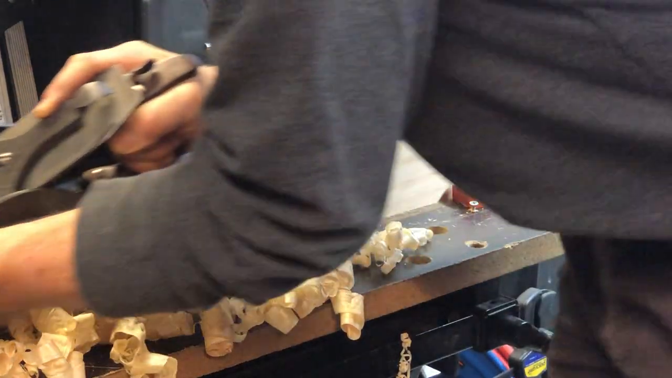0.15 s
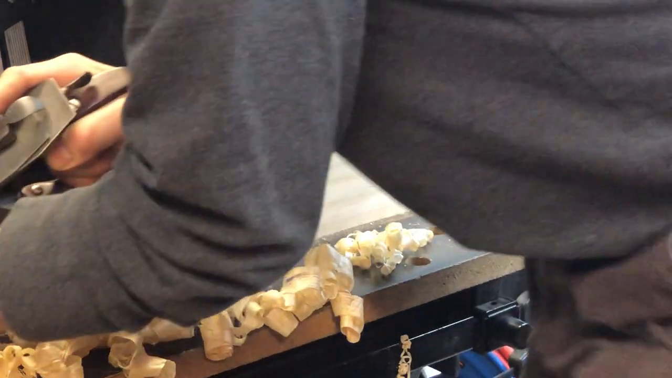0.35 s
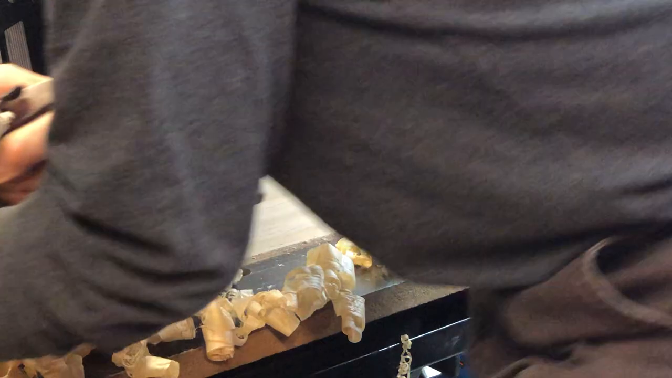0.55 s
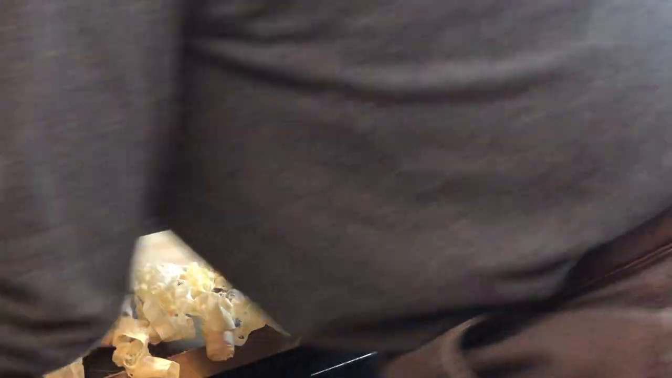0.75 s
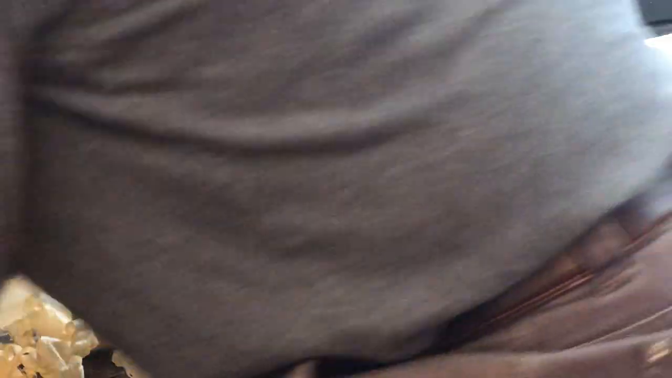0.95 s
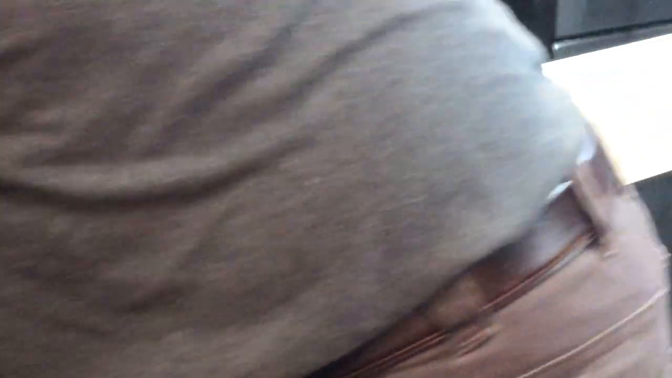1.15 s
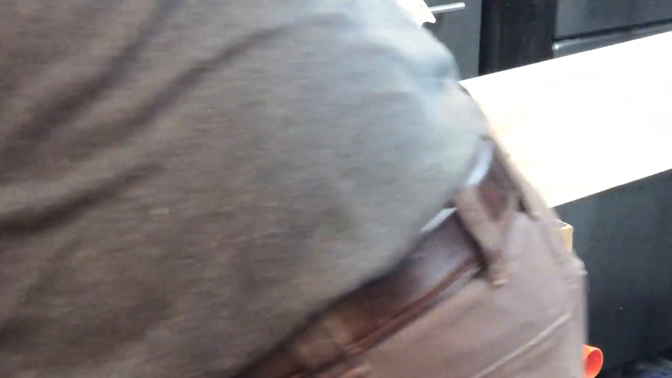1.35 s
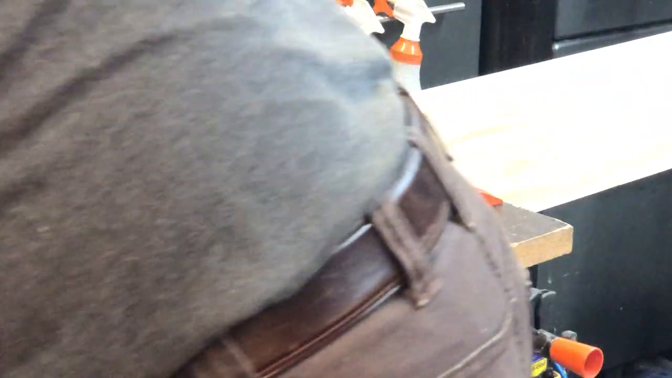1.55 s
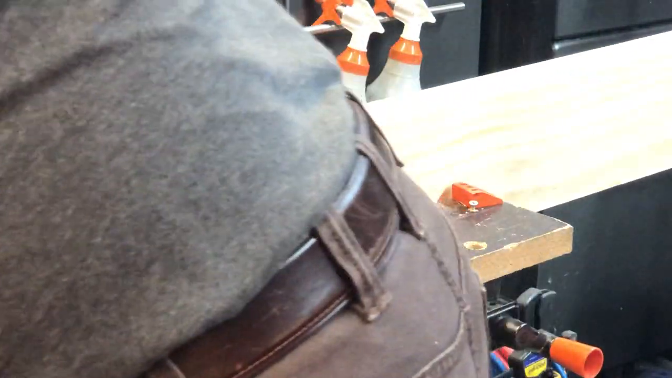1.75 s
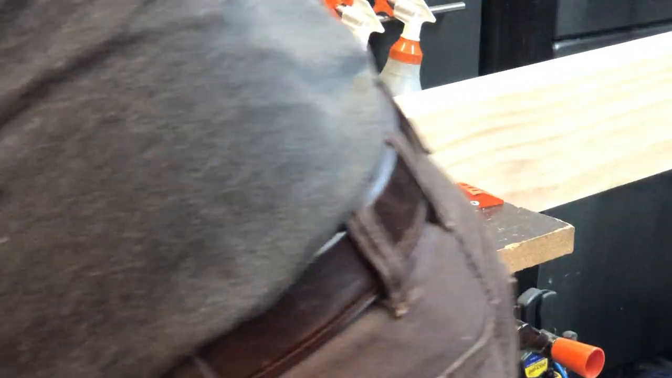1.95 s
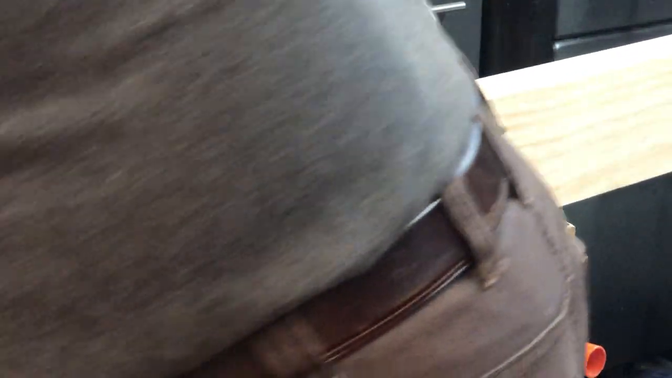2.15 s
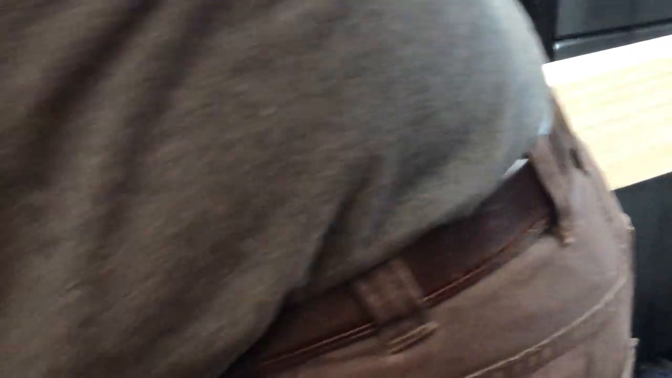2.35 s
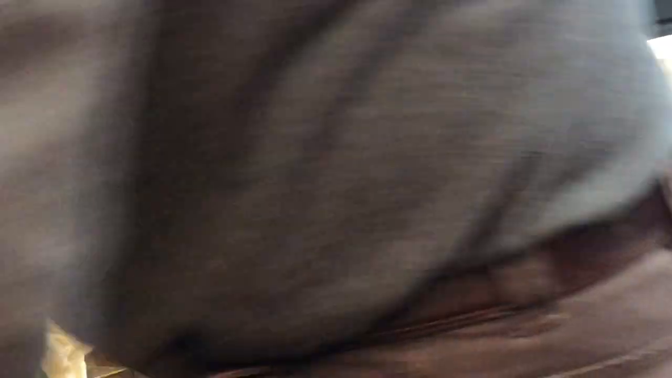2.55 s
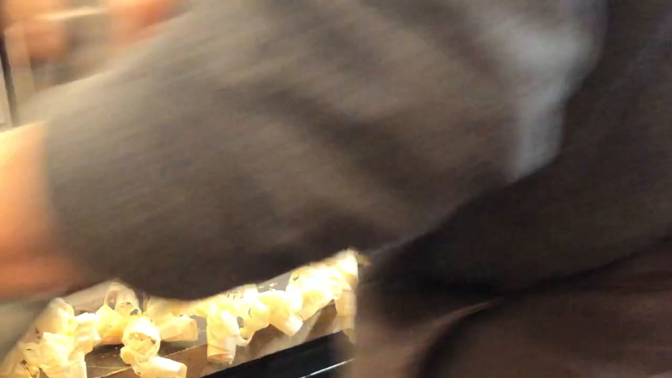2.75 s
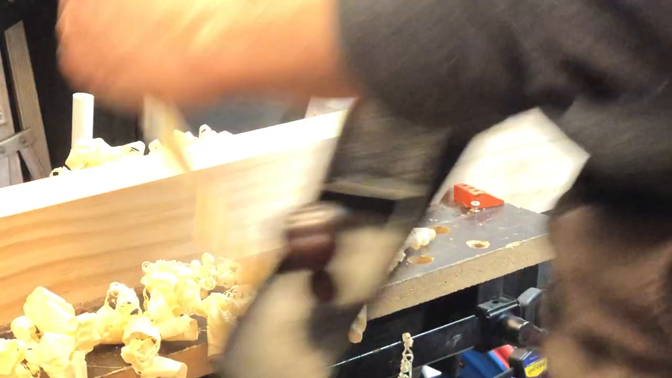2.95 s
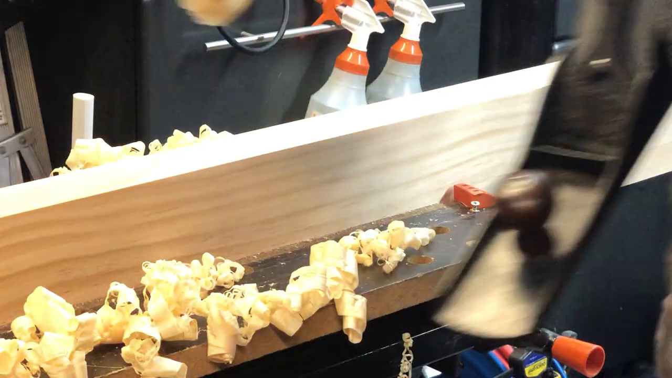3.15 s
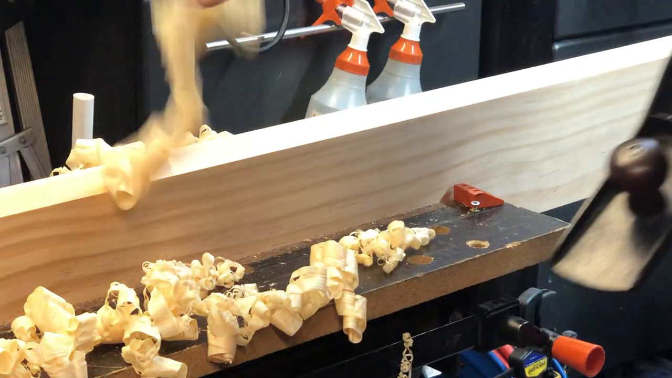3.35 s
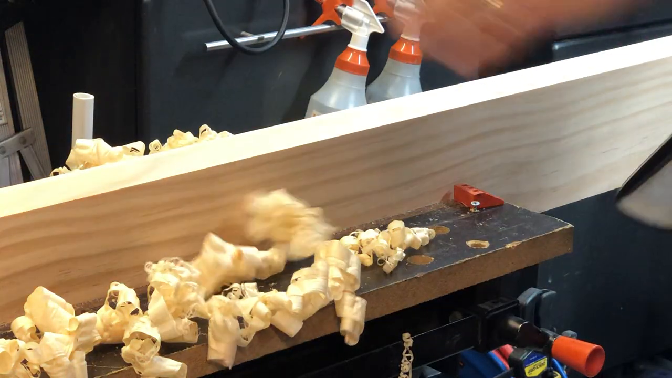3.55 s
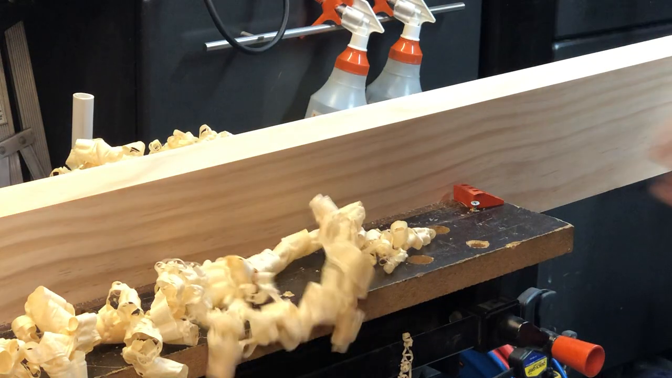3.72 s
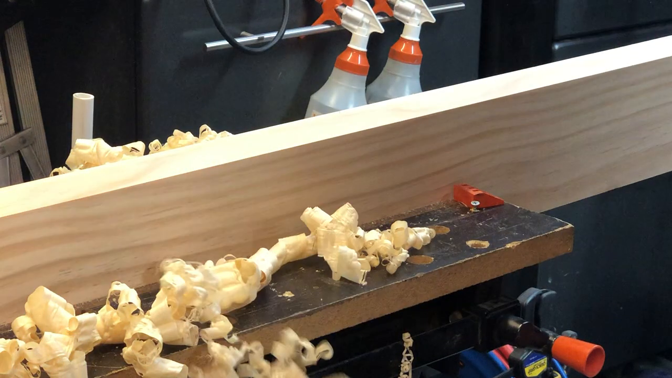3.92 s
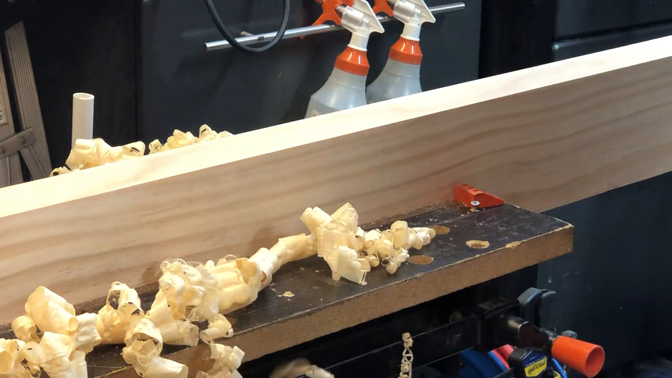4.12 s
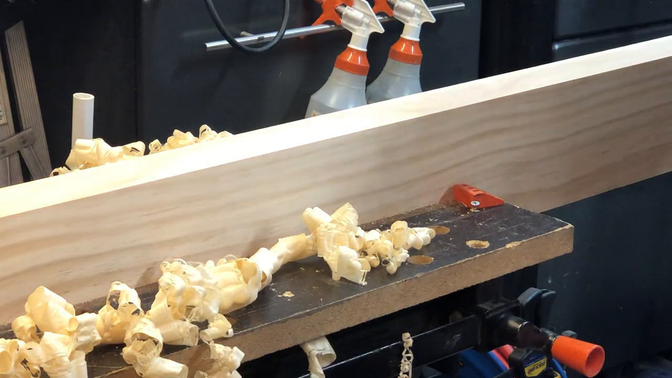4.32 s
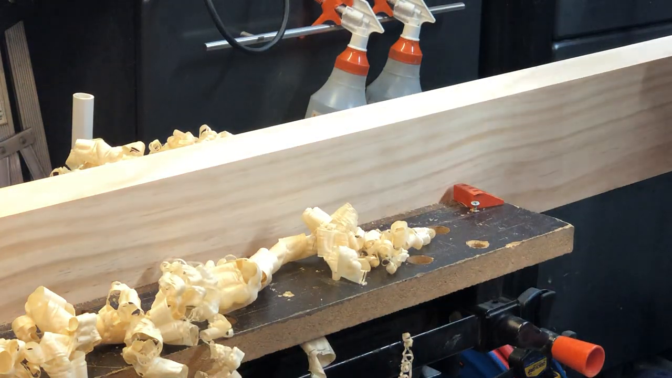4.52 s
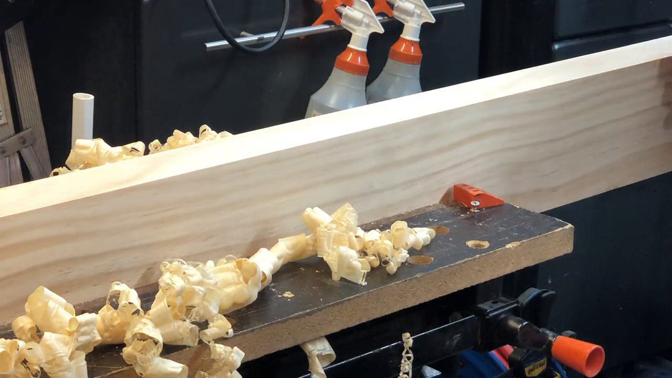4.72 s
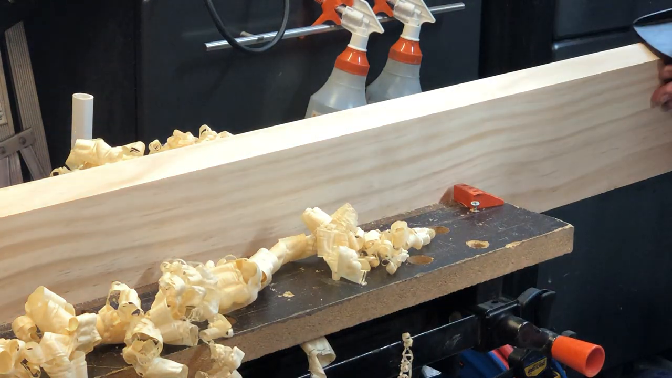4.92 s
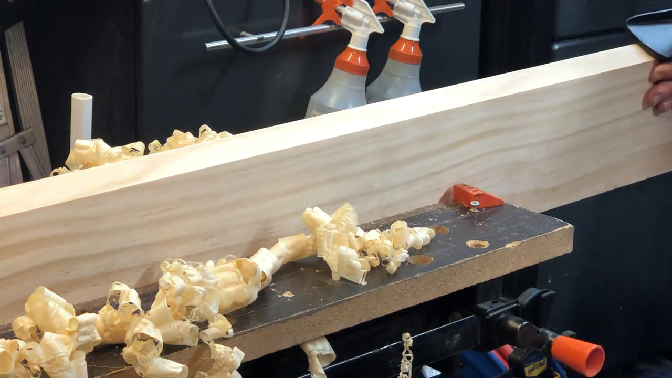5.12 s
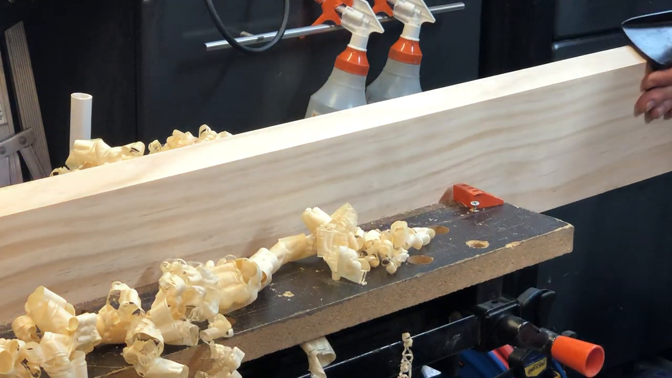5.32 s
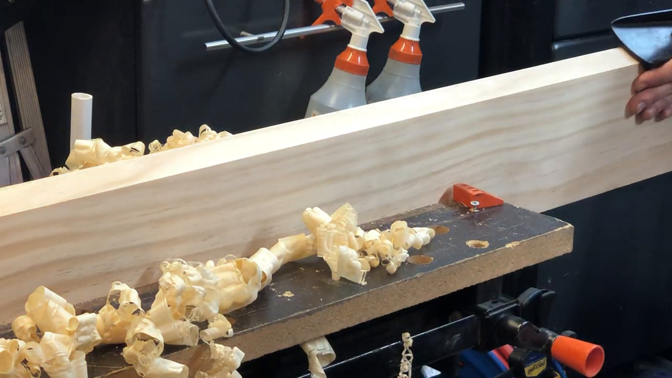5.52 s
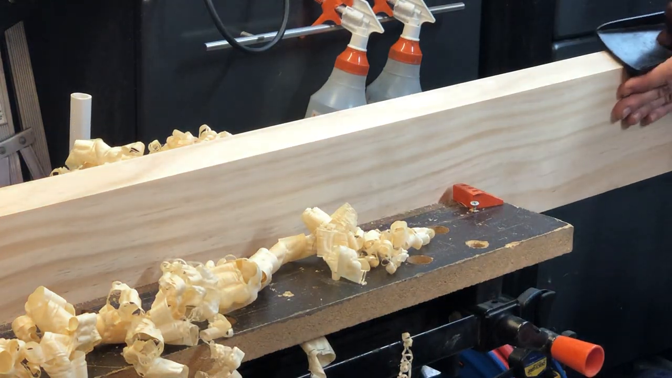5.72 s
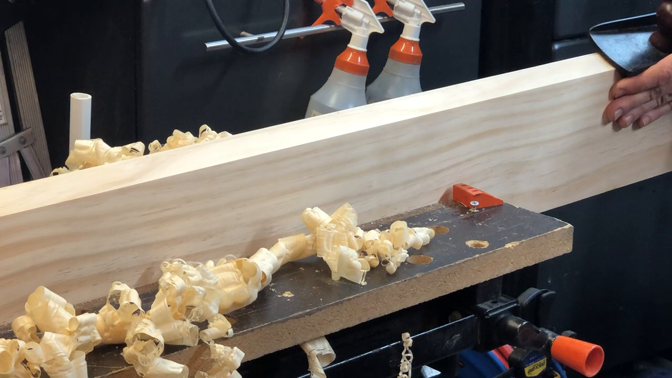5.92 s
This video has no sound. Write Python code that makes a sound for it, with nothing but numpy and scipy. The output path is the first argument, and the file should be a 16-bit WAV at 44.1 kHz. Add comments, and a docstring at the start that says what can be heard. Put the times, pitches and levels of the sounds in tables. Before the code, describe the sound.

A two-second planing stroke opens, rough and fibrous, harsh at first and calmer later, with board thuds and brief stick-slip squeals. After a rattling end, one bright clack rings briefly, papery curls crackle and land, then a dull knock, light taps and faint sliding follow. Short room reverberation, low steady room tone, close microphone, single channel.

```python
"""Small, quiet workshop: a hand plane takes one long shaving off a pine board's edge; the board knocks on the bench.
The lifted plane clacks; the shaving is pulled out and drops among the others; the plane is set down and slid.
Cutting, rubbing and paper sounds are random fibre breaks, filtered; drags and board modes are wandering tones.
Knocks and the clack are decaying modes with noise bursts; walls add a decaying echo, over steady background noise."""
import sys
import numpy as np
from scipy import signal
from scipy.fft import rfft, irfft, next_fast_len
from scipy.io import wavfile
from scipy.ndimage import uniform_filter1d, map_coordinates

SR = 44100
rng = np.random.default_rng(int(sys.argv[2]) if len(sys.argv) > 2 else 0)


def master(y):
    """Save y as 16-bit WAV."""
    cut = np.clip(np.atleast_2d(y).T, -1, 1)
    pcm = np.round(cut * 32767)  # scale
    wavfile.write(sys.argv[1], SR, pcm.astype(np.int16))


N = 263277
BURST_N = SR // 2


def amp(db):
    """Decibels to gain."""
    return 10 ** (np.asarray(db) / 20)


def unit(x):
    """Scale to rms 1."""
    return x / np.sqrt(np.mean(x ** 2) + 1e-20)


def clock():
    """Time of each sample, s."""
    return np.arange(N) / SR


def burst_clock():
    """Time of each sample of a half-second burst, s."""
    return np.arange(BURST_N) / SR


def burst_noise():
    """Half a second of white noise."""
    return rng.standard_normal(BURST_N)


def along(points, hz):
    """Interpolate (f/Hz, value) points on a log frequency axis."""
    f, v = np.transpose(points)
    return np.interp(np.log(hz + 1), np.log(f + 1), v)


def wobble(knots_per_s):
    """Smooth random curve."""
    knots = rng.standard_normal(int(N * knots_per_s / SR) + 4)
    return map_coordinates(knots, [clock() * knots_per_s])


def filtered(x, response):
    """Apply a complex frequency response."""
    m = next_fast_len(len(x) + 8192)
    return irfft(rfft(x, m) * response(np.fft.rfftfreq(m, 1 / SR)), m)[:len(x)]


def coloured(x, spectrum, top_hz=np.inf):
    """Shape x by a spectrum, dulled above top_hz; rms 1."""
    def response(hz):
        return amp(along(spectrum, hz)) / np.sqrt(1 + (hz / top_hz) ** 4)
    return unit(filtered(x, response))


def resonant(x, modes):
    """Pass x through parallel (f/Hz, width/Hz, level/dB) resonances of alternating sign; rms 1."""
    def response(hz):
        total = 0
        for k, (centre, width, db) in enumerate(modes):
            band = 1j * hz * width / (centre ** 2 - hz ** 2 + 1j * hz * width)
            total = total + (-1) ** k * amp(db) * band
        return total
    return unit(filtered(x, response))


def fractures(per_s, spread_db, size=N):
    """Fibre breaks: impulses at random moments, of random sign and size; rms 1."""
    hits = rng.random(size) < per_s / SR
    signs = rng.choice([-1, 1], size)
    sizes = amp(spread_db * np.clip(rng.standard_normal(size), -2, 2))
    return unit(hits * signs * sizes)


def burst(rise_s, t60_s):
    """Half-second envelope: linear rise to 1, then exponential decay."""
    t = burst_clock()
    return np.minimum(t / rise_s, 1) * amp(-60 * np.maximum(t - rise_s, 0) / t60_s)


def add(track, at_s, sound):
    """Mix a sound into the track at at_s."""
    part = track[max(round(at_s * SR), 0):][:len(sound)]
    part += sound[:len(part)]


def swell(start_s, length_s):
    """Gain that rises from start_s, holds and falls within length_s."""
    out = np.zeros(N)
    add(out, start_s, signal.windows.tukey(int(length_s * SR)))
    return out


def narrow(hz, width_hz):
    """Rough tone whose strength and phase wander with width_hz knots per second; rms 1."""
    phase = 2 * np.pi * np.cumsum(hz * np.ones(N)) / SR
    return unit(wobble(width_hz) * np.cos(phase) + wobble(width_hz) * np.sin(phase))


def bent(x, ratio):
    """Bend the pitch of x by a ratio per sample."""
    return map_coordinates(x, [np.cumsum(ratio)])


def patchy(x, depth_db):
    """Shift the colour of x in patches some hundreds of Hz wide; rms 1."""
    z = signal.stft(x, nperseg=256)[2]
    field = uniform_filter1d(rng.standard_normal(z.shape), 6, axis=0)
    field = uniform_filter1d(field, 8, axis=1)
    return unit(signal.istft(z * amp(depth_db * unit(field)), nperseg=256)[1][:len(x)])


SMEAR_HZ, MODE_SCATTER_RATIO = 11, .025  # mode width; pitch change from blow to blow


def blow(modes, rise_s):
    """One contact rings (f/Hz, level/dB, t60/s) modes with random scatter; loudest 20 ms at rms 1."""
    t, ring = burst_clock(), 0
    for hz, db, t60_s in modes:
        smear = np.cumsum(rng.standard_normal(len(t))) * np.sqrt(2 * np.pi * SMEAR_HZ / SR)
        turns = hz * (1 + MODE_SCATTER_RATIO * rng.standard_normal()) * t + rng.random()
        tone = burst(rise_s, t60_s) * np.sin(2 * np.pi * turns + smear)
        ring = ring + amp(db + rng.standard_normal()) * tone
    return ring / np.sqrt(uniform_filter1d(ring ** 2, SR // 50).max())


# workshop background: f/Hz, relative density/dB
AIR_SPECTRUM = [(20, -33), (32, -7), (45, -8.5), (80, -1), (160, 0), (260, -4.5), (400, -9.5), (900, -9.5),
                (1500, -14.5), (3000, -27), (8000, -31), (16000, -36)]
AIR_DB = -62


def workshop_air():
    """Steady background: coloured noise."""
    return amp(AIR_DB) * coloured(rng.standard_normal(N), AIR_SPECTRUM)


STOP_S, STOP_DB_PER_S = 2.093, 170


def plane_stop():
    """Gain that falls steeply as the plane runs out."""
    return amp(-STOP_DB_PER_S * np.maximum(clock() - STOP_S, 0))


# edge's bite along the stroke: t/s, level/dB
BITE = [(.1, -50.5), (.21, -55), (.265, -51), (.385, -63), (.44, -50.5), (.485, -57), (.57, -52.5),
        (.76, -47.5), (.92, -49.5), (1.15, -50), (1.47, -57.5), (1.55, -55.5), (1.62, -50.5), (1.86, -56.5),
        (1.95, -47), (2.0, -66), (2.2, -69)]
# board under the sole: f/Hz, relative density/dB
SOLE_SPECTRUM = [(40, -19), (130, -12), (400, -7.5), (560, -0.5), (750, -2.5), (900, -1), (1250, -1),
                 (1700, -3.5), (2300, -8), (3000, -16), (4500, -37), (9000, -28.5)]
# cutting iron at pitch ratio 1: f/Hz, width/Hz, relative level/dB
BLADE_MODES = [(2590, 310, -0.5), (2760, 150, 9.5), (2900, 520, -2)]
# iron's pitch under load: t/s, ratio
BLADE_PITCH = [(.1, 0.99), (.45, 0.99), (.78, 1.012), (1.1, 0.96)]
# shaving's hiss: f/Hz, relative density/dB
TEAR_SPECTRUM = [(600, -14.5), (2000, -2), (3000, 6.5), (4000, 2), (5200, -1), (8000, -3.5), (12000, -7),
                 (16000, -10.5)]
# coarser fibres: f/Hz, relative density/dB
SPLINTER_SPECTRUM = [(1000, -19), (3500, -3), (6000, -0.5), (9000, -0.5), (11500, -0.5), (16000, -5)]
# chipbreaker: f/Hz, width/Hz, relative level/dB
CHIPBREAKER_MODES = [(2210, 1950, 2.5), (2956, 280, 7), (3450, 150, 2), (4570, 670, -20)]
USUAL_BITE_DB = -50.5
SOLE_AT_USUAL_BITE_DB, SOLE_DB_PER_BITE_DB = -46.5, 0.15
BLADE_AT_USUAL_BITE_DB, BLADE_DB_PER_BITE_DB = -43.5, 1.8  # before the chatter calms
BLADE_WAVER_RATIO = 0.01813
CALM_S, CALM_TAKES_S, CALM_DB = 0.51, 0.44, 9  # plane gets well onto the board
CURL_S, CURL_LENGTH_S, CURL_DB, CURL_SOLE_DIP_DB = 1.55, 0.42, -46.5, 5
TEAR_RE_BITE_DB, TEAR_PATCH_DB = 2.0, 1.4
SPLINTER_PER_S, SPLINTER_RE_BITE_DB = 320, -8


def stroke():
    """Fibre breaks shake board and iron; the shaving hisses from the mouth and scrapes up the chipbreaker."""
    t = clock()
    bite_db = np.interp(t, *np.transpose(BITE))
    extra_db = bite_db - USUAL_BITE_DB
    grain = amp(0.78 * wobble(130) + 1.08 * wobble(22.35))  # hard and soft wood under the edge
    breaks = grain * fractures(per_s=7000, spread_db=2.5)

    curl = swell(CURL_S, CURL_LENGTH_S)
    rubbing_db = SOLE_AT_USUAL_BITE_DB + SOLE_DB_PER_BITE_DB * extra_db
    board = amp(rubbing_db - CURL_SOLE_DIP_DB * curl) * coloured(breaks, SOLE_SPECTRUM)

    calm = np.clip((t - CALM_S) / CALM_TAKES_S, 0, 1)
    chatter_db = BLADE_AT_USUAL_BITE_DB + BLADE_DB_PER_BITE_DB * extra_db - CALM_DB * calm
    pitch = np.interp(t, *np.transpose(BLADE_PITCH)) * (1 + BLADE_WAVER_RATIO * wobble(25))
    iron = resonant(resonant(breaks, BLADE_MODES), [(2880, 3400, 0)])
    blade = amp(chatter_db) * amp(1.06 * wobble(90.1)) * bent(iron, pitch)

    tearing = grain * fractures(per_s=7000, spread_db=2.0)
    hiss = patchy(coloured(tearing, TEAR_SPECTRUM), TEAR_PATCH_DB)
    shaving = amp(bite_db + TEAR_RE_BITE_DB) * hiss

    crackle = coloured(fractures(per_s=SPLINTER_PER_S, spread_db=0), SPLINTER_SPECTRUM)
    splinters = amp(bite_db + SPLINTER_RE_BITE_DB) * crackle

    scraping = grain * fractures(per_s=3600, spread_db=3.5)
    scrape = resonant(resonant(scraping, CHIPBREAKER_MODES), [(3000, 7500, 0)])
    curling = amp(CURL_DB) * curl * scrape
    return (board + blade + shaving + splinters + curling) * plane_stop()


# walls: f/Hz, t60/s
WALLS = [(150, 0.54), (1500, 0.36), (5000, 0.32), (14000, 0.3)]
NEAREST_SURFACE_DELAY_S = .006


def workshop_echo(x):
    """Walls answer with a noise tail, each frequency decaying at its own rate."""
    hz, t, z = signal.stft(burst_noise(), SR, nperseg=256)
    decay = amp(-60 * t / along(WALLS, hz)[:, None])
    tail = signal.istft(z * decay, SR, nperseg=256)[1]
    tail = np.pad(tail, (int(NEAREST_SURFACE_DELAY_S * SR), 0))
    return signal.fftconvolve(x, tail / np.linalg.norm(tail))[:N]


# stick-slip, hum if narrow, growl if wide: start t/s, length/s, f/Hz, width/Hz, level/dB
DRAGS = [(0.145, 0.043, 1324, 39.6, -49.5), (0.44, 0.058, 1495, 29.6, -44),
         (0.828, 0.099, 1534, 129.6, -49), (0.967, 0.24, 1399, 600, -49.5), (1.232, 0.068, 1650, 1300, -47),
         (1.303, 0.035, 1750, 220, -49), (1.427, 0.23, 1404, 699, -52), (1.77, 0.2, 1443, 502.4, -46.5),
         (5.643, 0.24, 1122, 703, -56)]


def squeaks():
    """Sole sticks and slips: rough tones that swell and fade, narrow or wide."""
    out = np.zeros(N)
    for start_s, length_s, hz, width_hz, db in DRAGS:
        out += amp(db) * swell(start_s, length_s) * narrow(hz, width_hz)
    return out


# board knocks on the bench, the last row the plane set down: t/s, thud level/dB (before THUD_TRIM_DB), thud low
# edge f/Hz, thud top edge f/Hz, # rattle level/dB, rattle top edge f/Hz
KNOCKS = [(0.2735, -37, 60, 900, -30.5, 3030), (.511, -33.5, 70, 1190, -32.5, 4500),
          (1.259, -42, 30, 900, -37.5, 4020), (1.339, -36.5, 30, 600, -50, 5000),
          (1.366, -42, 30, 300, -39.5, 2000), (2.008, -42.5, 30.5, 220, -61, 1190),
          (2.028, -42, 30, 280, -34, 7000), (2.048, -42, 30.2, 300, -41, 2500),
          (2.098, -43, 29.6, 600, -44, 4000), (2.126, -43.5, 50, 800, -48, 2500),
          (2.148, -41.5, 60, 800, -49, 2000), (2.245, -48.5, 150, 320, -70, 800),
          (4.9241, -34, 80, 430, -46.5, 2510)]
# bench, nominal: f/Hz, relative level/dB, t60/s
BENCH_MODES = [(106, -12.5, 0.18), (147, -1, 0.18), (203, -1.5, 0.13), (233, -5, .11), (288, -5, 0.15),
               (324.5, 0, 0.15), (417.6, -1, 0.11), (465, -1.5, .12), (615, -7.5, .08), (769, -6.5, 0.13)]
# rattling plane: f/Hz, relative density/dB
RATTLE_SPECTRUM = [(200, -30), (600, 4.5), (950, -2.5), (1400, 0.5), (1850, 5.5), (2400, -4.5), (5000, -8),
                   (15000, -13.5)]
# light touches on wood, the first where the shaving lands: t/s, level/dB, ring low edge f/Hz, tick top edge
# f/Hz
TAPS = [(4.084, -54.5, 150, 1290), (4.642, -48, 600, 1200), (4.726, -54.5, 250, 900),
        (5.116, -46, 98, 1170), (5.139, -52, 30, 500), (5.197, -52, 100, 800), (5.815, -63, 500, 1600)]
# lightly touched board, nominal: f/Hz, relative level/dB, t60/s
TOUCH_MODES = [(228, -8, .2), (289.4, -4.5, 0.27), (349, 0, 0.12), (538, -4, 0.11), (615, -7, .12),
               (781, 0, 0.1), (998, -6.5, 0.078), (1244, -14, 0.064)]
THUD_TRIM_DB = -2.0
REBOUND_S, REBOUND_LOSS_DB = .022, 9
TICK_RE_RING_DB, TICK_T60_S = -13.5, .07


def knocks():
    """Heavy knocks thud in the bench, rattle the plane and bounce once; light touches, the landing shaving
    among them, ring the wood."""
    out = np.zeros(N)
    for at_s, thud_db, low_hz, edge_hz, rattle_db, top_hz in KNOCKS:
        def thud_response(hz):
            """Each thud has its own low and top edge: some thinner, some duller."""
            return (1j * hz / (low_hz + 1j * hz)) ** 2 / (1 + 1j * hz / edge_hz)
        for delay_s, loss_db in [(0, 0), (REBOUND_S, REBOUND_LOSS_DB)]:
            thud = filtered(blow(BENCH_MODES, rise_s=0.0027), thud_response)
            rattle = burst(0.00025, 0.13) * coloured(burst_noise(), RATTLE_SPECTRUM, top_hz)
            knock = amp(thud_db + THUD_TRIM_DB) * thud + amp(rattle_db) * rattle
            add(out, at_s + delay_s, amp(-loss_db) * knock)
    for at_s, db, low_hz, top_hz in TAPS:
        tick = burst(0.0012, TICK_T60_S) * coloured(burst_noise(), RATTLE_SPECTRUM, top_hz)
        ring = filtered(blow(TOUCH_MODES, rise_s=0.0033), lambda hz: 1j * hz / (low_hz + 1j * hz))
        add(out, at_s, amp(db) * (ring + amp(TICK_RE_RING_DB) * tick))
    return out


# board modes as the edge passes their bellies: nominal f/Hz, width/Hz, peak t/s, half length/s, level/dB
BOARD_MODES = [(558, 55, .98, .27, -53.5), (852, 60, 1.036, 0.075, -51), (1209, 80, 0.73, 0.23, -54),
               (1400, 95, 1.092, 0.14, -47), (1174, 130, 1.59, .4, -54), (1465, 170, 1.57, .5, -51.5),
               (1686, 220, 1.36, .4, -53), (2590, 80, 1.095, .1, -55)]
BOARD_WAVER_RATIO, BOARD_FLUTTER_DB = .035, 3  # load shifts


def singing():
    """Board modes swell, flutter and fade as the cut travels along."""
    t, out = clock(), np.zeros(N)
    for hz, width_hz, peak_s, half_s, db in BOARD_MODES:
        strength = amp(db + BOARD_FLUTTER_DB * wobble(24.08))
        passing = np.exp(-((t - peak_s) / half_s) ** 4)
        pitch_hz = hz * (1 + BOARD_WAVER_RATIO * wobble(20))
        out += strength * passing * narrow(pitch_hz, width_hz)
    return out * plane_stop()


# shaving drawn out, let go, settling: peak t/s, level/dB (before RUSTLE_TRIM_DB), rise/(dB/s), fall/(dB/s)
RUSTLES = [(2.86, -51, 27, 22), (3.28, -54.5, 90, 280), (3.55, -56, 170, 20.5), (4.3, -59.5, 15, 55)]
# dry shaving: f/Hz, relative density/dB
PAPERY_SPECTRUM = [(530, -11), (900, -7), (1390, -8.5), (1790, -7), (2700, -3.5), (3910, -1.5), (6560, -4),
                   (8250, -3.5), (15100, -11), (16000, -11)]
# curls crumple or land: t/s, level/dB, rise/s, t60/s, top edge f/Hz
CRUMPLES = [(.512, -37.5, 0.0014, 0.068, 11200), (1.337, -42, 0.0029, 0.12, 15000),
            (1.968, -39, 0.0022, 0.051, 16000), (2.787, -47, 0.023, 0.14, 18000),
            (2.967, -48.5, .004, 0.15, 14000), (3.383, -46.5, 0.0042, 0.37, 11000),
            (3.488, -46, 0.023, 0.28, 11000), (3.605, -55, 0.006, 0.69, 4500),
            (3.7, -57.5, .004, 0.086, 5030), (3.813, -54.5, 0.0057, 0.11, 6000),
            (3.915, -60, 0.0054, 0.48, 1980), (4.082, -48, 0.0015, 0.29, 11000)]
# fibres snap, stiff curls strike: t/s, level/dB, centre f/Hz
SNAPS = [(1.969, -35, 8000), (2.8183, -32.5, 10100), (2.8475, -32.5, 9000), (2.8491, -28.5, 2720),
         (2.9592, -36.5, 9000), (3.3785, -46, 9000), (3.388, -39, 8000), (3.3899, -36, 3300),
         (3.408, -44, 4480), (4.0812, -38.5, 7000)]
RUSTLE_TRIM_DB, CURL_PATCH_DB, SNAP_T60_S = -3.0, 2.1, 0.0088
STRAY_PER_S, STRAY_RE_RUSTLE_DB, STRAY_T60_S, STRAY_SPREAD_DB = 70, -13, 0.035, 2.5


def curls():
    """Dry shaving crackles as it is pulled, snaps free and lands in soft crunches."""
    t = clock()
    motions_db = [db - np.maximum(rise * (peak_s - t), fall * (t - peak_s))
                  for peak_s, db, rise, fall in RUSTLES]
    motion_db = np.max(motions_db, axis=0)
    stray_hits = np.abs(fractures(per_s=STRAY_PER_S, spread_db=STRAY_SPREAD_DB))
    strays = unit(signal.fftconvolve(stray_hits, burst(0.00064, STRAY_T60_S))[:N])
    activity = amp(1.45 * wobble(35)) + amp(STRAY_RE_RUSTLE_DB) * strays
    rustle = patchy(coloured(fractures(per_s=10000, spread_db=1.5), PAPERY_SPECTRUM), CURL_PATCH_DB)
    out = amp(motion_db + RUSTLE_TRIM_DB) * activity * rustle
    for at_s, db, rise_s, t60_s, top_hz in CRUMPLES:
        breaks = fractures(per_s=7000, spread_db=0, size=BURST_N)
        crunch = patchy(coloured(breaks, PAPERY_SPECTRUM, top_hz), CURL_PATCH_DB)
        add(out, at_s, amp(db) * burst(rise_s, t60_s) * crunch)
    for at_s, db, hz in SNAPS:
        crack = resonant(resonant(burst_noise(), [(hz, hz, 0)]), [(hz, 2 * hz, 0)])
        add(out, at_s, amp(db) * burst(0.00037, SNAP_T60_S) * crack)
    return out


# sole on wood: fastest t/s, half length/s, level/dB, top edge f/Hz
SLIDES = [(2.069, 0.096, -46.5, 3960), (4.691, 0.041, -56, 5000), (5.005, 0.063, -50.5, 5400),
          (5.147, 0.12, -64, 3040), (5.44, 0.25, -69, 1800), (5.74, 0.12, -56.5, 990)]
# sliding hiss: f/Hz, relative density/dB
SLIDING_SPECTRUM = [(100, -16), (350, -3), (700, -3), (1100, -4.5), (1600, -2), (4000, -1.5), (9000, -8),
                    (16000, -15)]


def slides():
    """Pushes without a cut: the sole hisses over the wood, louder when faster."""
    out = np.zeros(N)
    for fastest_s, half_s, db, top_hz in SLIDES:
        speed = np.exp(-((clock() - fastest_s) / half_s) ** 2)
        hiss = filtered(fractures(per_s=7000, spread_db=2.5), lambda hz: 1 / (1 + 1j * hz / top_hz))
        out += amp(db) * speed * coloured(hiss, SLIDING_SPECTRUM)
    return out


# plane's body: f/Hz, relative level/dB, t60/s
BODY_MODES = [(647, -31, 0.12), (1100, -13, 0.036), (1315, -12, 0.04), (1600, -13.5, 0.044),
              (1705, 3, 0.04), (1790, -16, 0.018), (2026, -10, 0.033), (2480, -9.5, 0.035),
              (2610, -2, 0.023), (2810, -5.5, 0.02), (3400, -17.5, 0.07), (4030, -24, .04),
              (4380, -25, .04), (5800, -18, 0.04), (6000, -22, 0.02), (6770, -24, .03)]
CLACK_S = 2.5508  # loose iron seats in the lifted plane
BUZZ_TILT = .45  # buzz favours strong modes less than the blow does


def clack():
    """One blow rings the plane's hand-damped body; loose parts buzz on briefly."""
    out, t, ring = np.zeros(N), burst_clock(), 0
    for hz, db, t60_s in BODY_MODES:
        ring = ring + amp(db) * burst(0.002, t60_s) * np.sin(2 * np.pi * hz * t)
    crack = burst(0.00069, 0.038) * coloured(burst_noise(), RATTLE_SPECTRUM)
    buzz_modes = [(hz, 300, BUZZ_TILT * db) for hz, db, _ in BODY_MODES]
    buzz = burst(0.0084, 0.32) * resonant(burst_noise(), buzz_modes)
    add(out, CLACK_S, amp(-24.5) * ring + amp(-40.5) * crack + amp(-45.5) * buzz)
    return out


WORK_ECHO_DB, CLACK_ECHO_DB = -8.0, -11.5  # plane held close: drier clack


def scene():
    """Bench work, its echo and the background."""
    air = workshop_air()
    work = stroke() + squeaks() + knocks() + singing() + curls() + slides()
    plane_clack = clack()
    echo = workshop_echo(amp(WORK_ECHO_DB) * work + amp(CLACK_ECHO_DB) * plane_clack)
    return (work + plane_clack + echo + air)[None]


TOP_HZ = 15900


def record(dry):
    """Band limit: nothing from TOP_HZ up."""
    return np.array([filtered(channel, lambda hz: hz < TOP_HZ) for channel in dry])


dry = scene()
out = record(dry)
master(out)
```